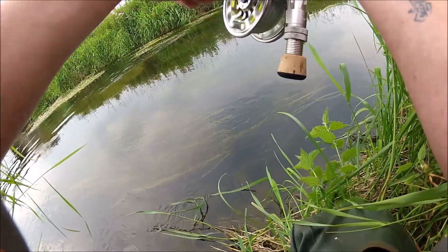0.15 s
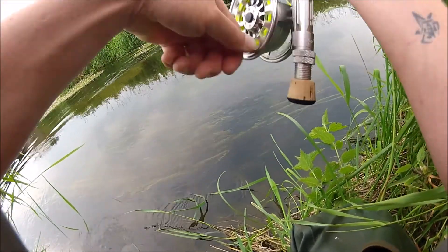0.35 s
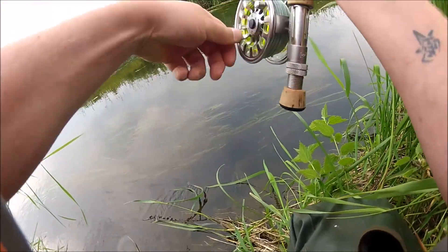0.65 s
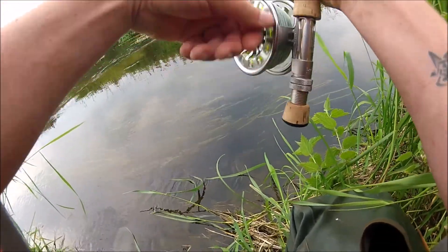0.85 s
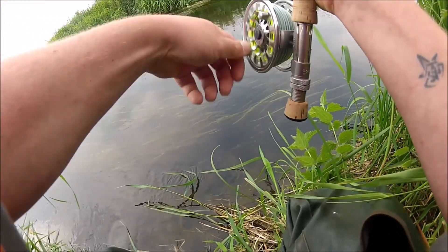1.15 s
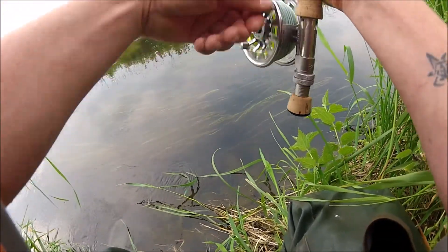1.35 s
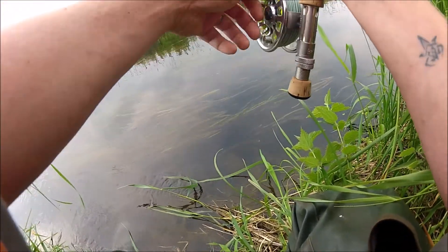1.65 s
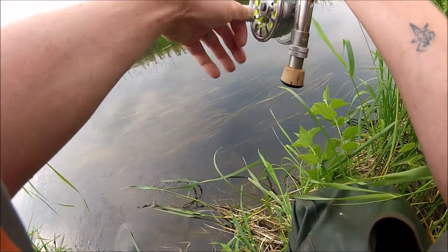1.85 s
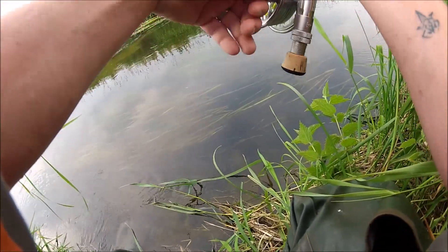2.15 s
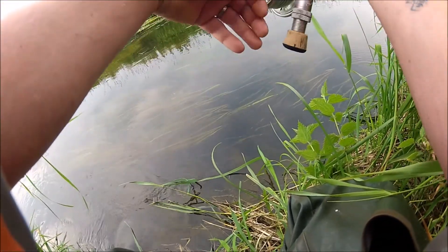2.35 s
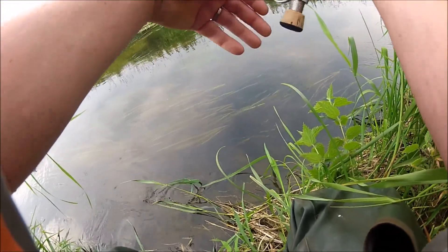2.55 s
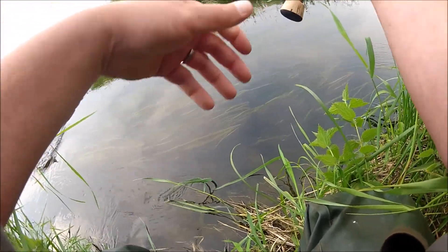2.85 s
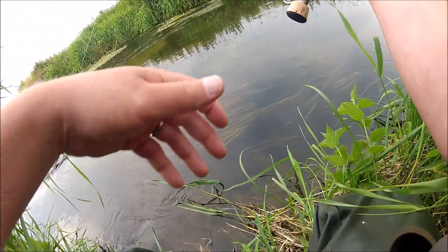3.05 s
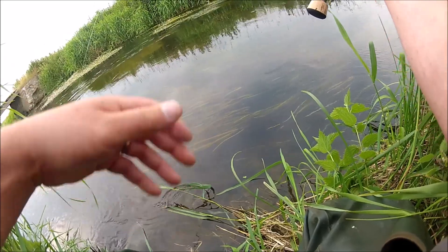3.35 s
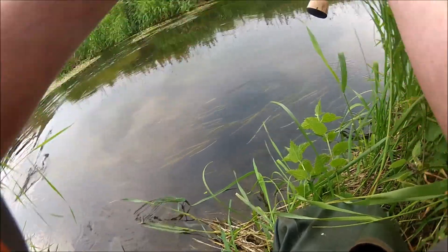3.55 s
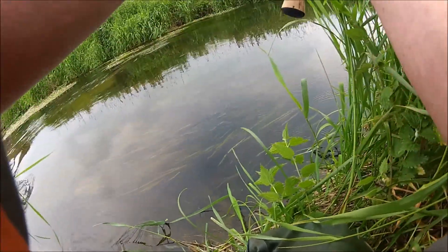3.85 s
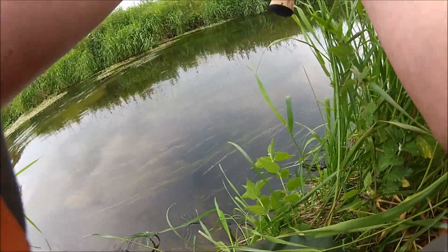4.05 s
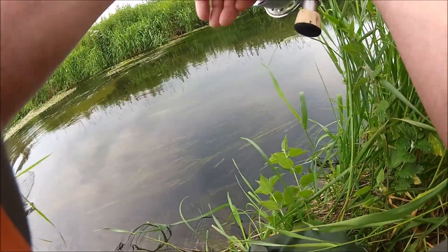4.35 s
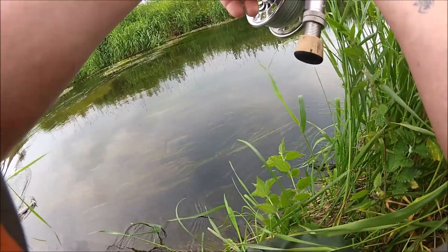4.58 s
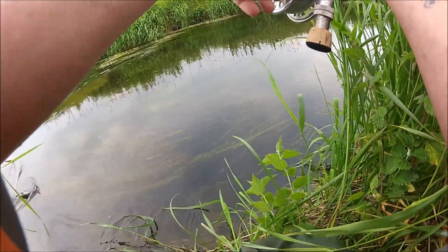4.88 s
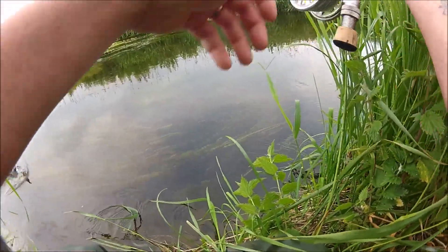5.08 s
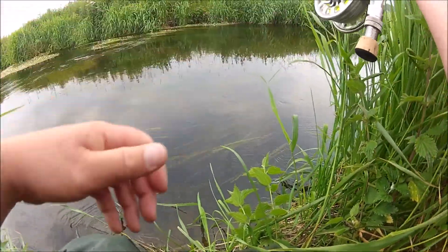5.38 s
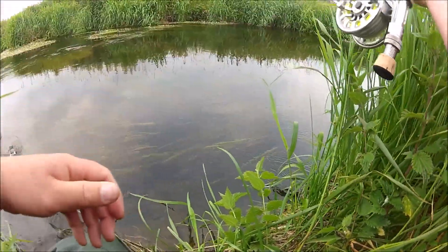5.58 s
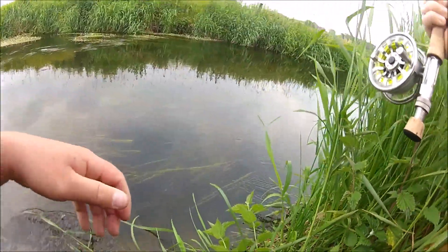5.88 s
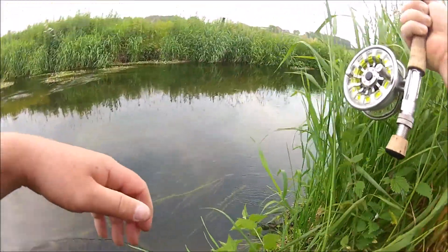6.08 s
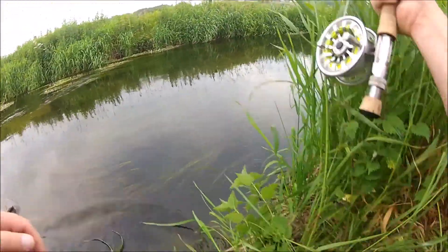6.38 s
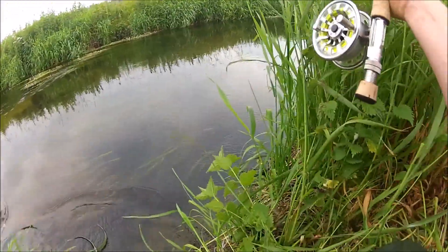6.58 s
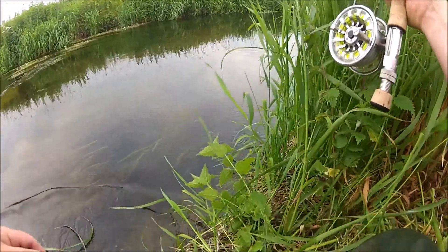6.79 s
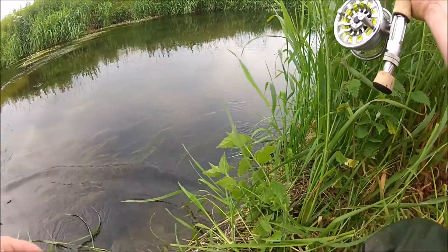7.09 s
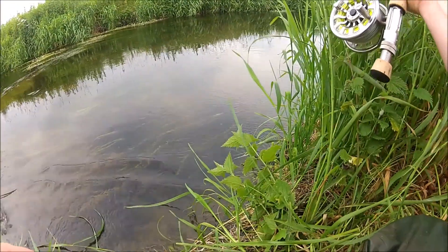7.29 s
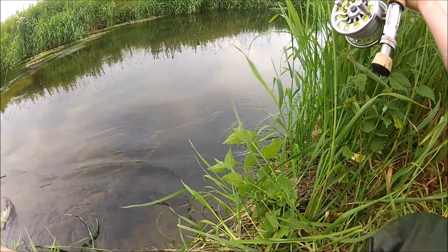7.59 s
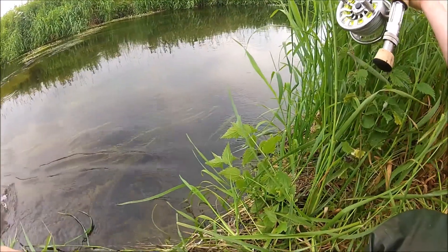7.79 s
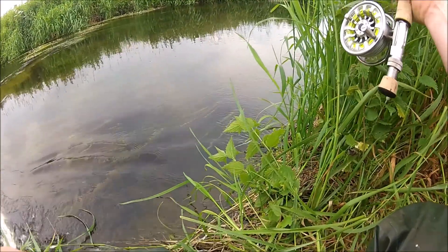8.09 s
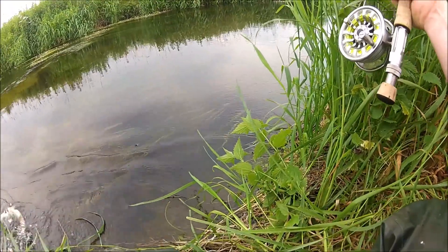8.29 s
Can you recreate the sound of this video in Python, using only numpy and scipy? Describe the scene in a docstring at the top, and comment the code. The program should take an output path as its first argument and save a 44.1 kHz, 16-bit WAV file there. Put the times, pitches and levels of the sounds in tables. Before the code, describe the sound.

A fly reel's click pawl snaps and ratchets in uneven metallic bursts, with hollow knocks, brief squeaks and soft hand rubbing, outdoors and very close.

```python
"""A fly reel clicks outdoors, close to the microphone of a camera in a sealed case.
Its sprung pawl snaps over gear teeth, singly and in quick runs: metallic chatter, then a hollow knock.
Fast runs merge into a sung tone or a squeak; soft taps, thin ticks, dull thumps and short tones lie between.
Behind it hands, sleeves and line rub and rustle as shaped noise, over a quiet wash of air."""
import sys
import numpy as np
from scipy import signal
from scipy.fft import rfft, irfft, next_fast_len
from scipy.io import wavfile
from scipy.ndimage import uniform_filter1d

SR = 44100
rng = np.random.default_rng(int(sys.argv[2]) if len(sys.argv) > 2 else 0)


def log_audio(samples):
    """Write samples as a 16-bit WAV file to the path given in sys.argv[1]."""
    # one column per channel
    frames = np.atleast_2d(samples).T
    # limit to full scale, then quantise
    limited = np.clip(frames, -1, 1)
    pcm = np.round(limited * 32767).astype(np.int16)
    wavfile.write(sys.argv[1], SR, pcm)


N = 371742


# how far the knock stands above the chatter as grip and angle of the reel change: t/s, level/dB
HOLLOWNESS = [(.2, 7.5), (1.5, 6.5), (2.75, 3.5), (3.3, 1.5), (3.46, 10.5), (3.7, 6), (4.5, 4), (5.1, 6.5),
              (5.45, 1), (6.02, 8.5), (6.44, 4), (6.9, 4), (8.43, 9.5)]


def hollowness(s):
    """The knock's level over the chatter in dB, gliding between the table's points."""
    return np.interp(s, *np.transpose(HOLLOWNESS))


# above this speed the pawl no longer drops in but skates, struck once per swing of the body: a squeak
SKATE_PER_S = 235


def skating(rate):
    """How far a run has turned to squeak, 0-1, rising with the speed in teeth per s."""
    return np.clip(5 * (rate / SKATE_PER_S - 1), 0, 1)


# single snaps of the pawl: t/s, relative chatter level/dB, knock pitch f/Hz
SNAPS = [(.032, -25, 484), (0.1814, -19.5, 995), (0.1907, -12.5, 620), (0.3183, -30, 700),
         (0.3334, -19.5, 609), (0.5723, -20.5, 790), (1.092, -25.5, 758), (1.1863, -29.5, 800),
         (1.3115, -29.5, 570), (1.4338, -18, 790), (1.5, -13, 1013), (1.632, -31, 600),
         (1.7603, -14.5, 1039), (2.7292, -16.5, 746), (2.765, -12, 676), (2.853, -14, 787),
         (3.3164, -14, 712), (3.4405, -13, 685), (3.4642, -13, 640), (3.617, -15, 945), (3.692, -21, 730),
         (3.8044, -23.5, 626), (3.8308, -29.5, 600), (3.889, -25.5, 685), (3.919, -25.5, 718),
         (4.0227, -22, 553), (4.0498, -28, 618), (4.1831, -17.5, 595), (4.4474, -23.5, 914),
         (4.466, -23.5, 655), (4.554, -22, 905), (5.203, -17.5, 701), (5.2789, -16, 699),
         (5.3892, -16.5, 944), (5.4281, -16, 999), (5.5196, -19, 968), (5.5468, -16.5, 996),
         (5.5792, -18.5, 902), (5.6047, -18, 873), (5.6316, -18.5, 451), (5.6508, -18.5, 633),
         (5.67, -17.5, 936), (5.698, -17.5, 630), (5.7354, -15.5, 710), (5.8028, -14, 650),
         (5.831, -17, 858), (5.9, -18.5, 720), (5.9199, -18, 715), (5.9359, -19, 699), (6.4416, -16.5, 657),
         (6.6117, -18.5, 952), (6.656, -16, 920), (6.727, -13.5, 750), (8.067, -15, 663),
         (8.1358, -17, 722), (8.1967, -15.5, 677), (8.2114, -18, 670), (8.223, -15.5, 665),
         (8.232, -17, 708), (8.252, -16, 670), (8.3406, -15.5, 685), (8.4051, -16.5, 683)]
# the spool spins, one curve a run: t/s, speed/teeth per s, relative chatter level/dB, mean knock pitch f/Hz
RUNS = [
    [(3.476, 191, -16, 668), (3.513, 190, -19.5, 630)],
    [(3.524, 118, -32, 674), (3.593, 87, -25.5, 706)],
    [(4.393, 133, -23.5, 910), (4.436, 250, -25.5, 1005)],
    [(4.506, 110, -23.5, 714), (4.54, 130, -24, 804)],
    [(4.563, 245, -26.5, 955), (4.59, 197, -23.5, 962)],
    [(4.886, 83, -21.5, 1017), (4.934, 114, -19, 957.5), (4.985, 236, -22, 619), (5.045, 280, -21.5, 792),
     (5.066, 111, -20, 655), (5.144, 180, -19, 718.5)],
    [(5.282, 240, -18.5, 699), (5.306, 260, -18.5, 730), (5.322, 276, -19, 1143), (5.353, 266, -18, 916)],
    [(5.441, 82, -18, 909), (5.499, 82, -18, 894)],
    [(6.007, 83, -14, 635), (6.035, 76, -21.5, 630)],
    [(6.508, 270, -19, 646), (6.535, 262, -21, 601), (6.558, 290, -21, 1063), (6.581, 240, -20, 841)],
    [(6.624, 198, -18.5, 916), (6.64, 256, -18, 796)],
    [(6.802, 188, -13, 673), (6.836, 154, -13, 648.5)],
    [(6.847, 254, -13.5, 669.6), (6.92, 256, -15.5, 697)],
    [(7.923, 199, -15.5, 654), (7.96, 165, -18, 670)],
    [(8.089, 106, -15.5, 697.5), (8.115, 90, -19, 677)],
]
# soft dull taps of the pawl under light load: t/s, relative level/dB
TAPS = [(0.113, -22.5), (0.236, -23), (0.288, -21.5), (0.611, -25.5), (0.692, -21.5), (0.712, -25),
        (0.736, -21), (0.76, -18), (0.779, -23.5), (0.798, -19.5), (0.962, -27), (0.985, -30), (1.002, -26),
        (1.016, -30.5), (1.031, -33), (1.812, -29), (2.106, -28), (2.31, -23), (2.356, -26), (3.079, -25)]
# thin ticks, metal with little knock: t/s, relative chatter level/dB
TICKS = [(.069, -17), (.199, -21), (2.483, -30), (3.5155, -5.5), (3.599, -20.5), (3.767, -17.5),
         (4.2688, -20), (4.3743, -20.5), (4.711, -18.5), (5.317, -13), (5.3602, -19), (5.4102, -21.5),
         (6.5987, -19.5)]
# dull knocks of hand and handle, with little metal: t/s, knock level/dB, pitch f/Hz
THUMPS = [(1.2445, -12, 582), (1.654, -19.5, 604), (1.85, -20, 625), (2.2242, -17.5, 480),
          (2.235, -18, 596), (2.387, -24, 530), (2.508, -19, 613), (4.38, -9.5, 492), (4.496, -18, 930),
          (5.865, -10.5, 565), (5.9986, -12.5, 570), (6.2196, -11.5, 572)]
TICK_KNOCK_DB, TICK_HZ = -5, 822  # knock relative to the chatter
TAP_KNOCK_DB, TAP_HZ = -1.5, 753  # knock relative to the tap
THUMP_CHATTER_DB = -22  # chatter relative to the knock
SKATE_QUIET_DB = -10  # change of each blow when fully skating


def run_teeth(run):
    """The blows of one run: the next tooth follows at the spool's speed, in whole swings of the body."""
    rows = []
    times, *columns = np.transpose(run)
    s = times[0]
    for uneven, hard, deep, detune in rng.standard_normal((70, 4)):
        if s >= times[-1] + .001:
            break
        rate, db, hz = (np.interp(s, times, column) for column in columns)
        db += SKATE_QUIET_DB * skating(rate)
        hz *= 1 + .025 * detune
        chatter_db = db + 1.8 * hard
        knock_db = db + hollowness(s) + 2.5 * deep
        rows.append((s, chatter_db, knock_db, hz))
        # the pawl slips in step with the swinging body, so a fast run sings; fast runs are less even
        gap_s = np.exp(.0003 * rate * uneven) / rate
        s += max(np.round(gap_s * hz), 1) / hz
    return rows


def teeth():
    """Every blow as (t/s, relative chatter level/dB, knock level/dB, knock pitch f/Hz)."""
    rows = [(s, db, db + TICK_KNOCK_DB, TICK_HZ) for s, db in TICKS]
    rows += [(s, -np.inf, db + TAP_KNOCK_DB, TAP_HZ) for s, db in TAPS]
    rows += [(s, db + THUMP_CHATTER_DB, db, hz) for s, db, hz in THUMPS]
    rows += [(s, db, db + hollowness(s), hz) for s, db, hz in SNAPS]
    for run in RUNS:
        rows += run_teeth(run)
    return np.array(rows)


def chatter(rows):
    """The pawl lands and is struck again at each swing of the knocking body, so the chatter shares its pitch."""
    blows, t = np.zeros(N), np.arange(1200) / SR
    for s, db, _, hz in rows:
        grit, luck = rng.standard_normal(1200), rng.standard_normal((7, 2))
        contact = 0.13 * grit * np.exp(-t / 0.0039)
        # six strikes, about one swing apart
        swings = SR / hz * np.exp(.04 * luck[1:6, 0])
        at = np.cumsum(np.r_[0, swings]).astype(int)
        contact[at] += np.exp(-(at / SR * hz / 2.3) ** 2 + .2 * luck[:6, 1])
        # a weak contact lasts longer and is duller
        soft = np.clip(-.022 * db + 0.26 * luck[6, 0], 0, .85)
        contact = signal.lfilter([np.sqrt(1 - soft ** 2)], [1, -soft], contact)
        add(blows, s, gain_of(db) * contact)
    return gain_of(13.5) * metal(blows)


# ringing of spool and frame: f/Hz, width/Hz, relative level/dB
METAL = [(2003, 670, -0.5), (3040, 240, -6), (3540, 270, -5.5), (3994, 254, -6), (4760, 850, -7.5),
         (7090, 460, -10), (8040, 360, -7.5), (8680, 540, -7), (10030, 670, -7.5), (11290, 240, -13),
         (12790, 270, -12.5), (14100, 300, -12.5), (14530, 300, -9.5)]


def metal(x):
    """Rings the modes of spool and frame, which are too small to radiate bass."""
    t = np.arange(2000) / SR
    ring = np.zeros(2000)
    for k, (hz, width, db) in enumerate(METAL):
        decay = np.sqrt(width) * np.exp(-np.pi * width * t)  # a wider mode dies sooner
        ring += (-1) ** k * gain_of(db) * decay * np.sin(2 * np.pi * hz * t)
    ring = signal.sosfilt(signal.butter(3, 1500, "high", fs=SR, output="sos"), ring)
    return signal.oaconvolve(x, ring / np.linalg.norm(ring))[:N]


def knock(rows):
    """A hollow body swings up over a few cycles after the blow, drops fast and hums on faintly."""
    out, t = np.zeros(N), np.arange(2200) / SR
    for s, _, db, hz in rows:
        swing = np.exp(-((hz * t - 2.4) / 1.032) ** 2) * (1 - np.exp(-hz * t / 0.53))
        hum = 0.5 * (1 - np.exp(-t / 0.0011)) * np.exp(-t / 0.0058)
        body = swing * np.cos(2 * np.pi * hz * t)
        body += hum * np.sin(2 * np.pi * 0.832 * hz * t)  # the hum lies below the knock's pitch
        add(out, s, gain_of(db) * body)
    return out


# the two damped tones of a soft tap: mean f/Hz, decay/s, relative level/dB
TAP_RING = [(2120, 0.00035, 9), (1380, 0.0005, 4.5)]


def taps():
    """One cushioned blow wakes only two low modes, each slightly off its mean pitch."""
    out, t = np.zeros(N), np.arange(400) / SR
    for s, db in TAPS:
        for hz, decay, ring_db in TAP_RING:
            swell = t / decay * np.exp(-t / decay)
            pitch = hz * (1 + 0.078 * rng.standard_normal())
            add(out, s, gain_of(db + ring_db) * swell * np.sin(2 * np.pi * pitch * t))
    return out


SING_PER_S, SING_DB = 185, -5  # around this speed the knocks merge into a tone, this far from one knock
SQUEAK_DB, SQUEAK_TILT = -9.5, 0.38  # level relative to chatter; power by which overtones weaken


def singing():
    """In a fast run the body never rests between teeth and sings at its knock pitch; skating adds overtones."""
    out, strikes, waver = np.zeros(N), np.zeros(N), lumps(90, 2.3)
    for run in RUNS:
        times, *columns = np.transpose(run)
        t = np.arange(times[0], times[-1], 1 / SR)
        rate, db, hz = (np.interp(t, times, column) for column in columns)
        wobble = evened(uniform_filter1d(rng.standard_normal(len(t)), size=150))
        turns = np.cumsum(hz * (1 + 0.024 * wobble)) / SR + rng.random()
        fade = signal.windows.tukey(len(t), .3)
        merged = np.clip(2 * rate / SING_PER_S - 1.5, 0, 1) * fade
        tone_gain = gain_of(SING_DB + db + hollowness(t))
        add(out, times[0], merged * tone_gain * np.sin(2 * np.pi * turns))
        pulses = sum(np.cos(2 * np.pi * k * turns) / k ** SQUEAK_TILT for k in range(2, 15))
        add(strikes, times[0], skating(rate) * fade * gain_of(SQUEAK_DB + db) * pulses)
    return out * waver + metal(strikes * lumps(150, 2.7))


# short tones, gliding or nearly steady:
# t/s, length/s, starting level/dB, start f/Hz, end f/Hz, level of two added higher partials/dB
NOTES = [(2.328, 0.027, -14.5, 510, 630, -48), (2.767, .03, -6, 715, 708, -23.5),
         (7.767, .035, -23, 566, 285, -50)]


def notes():
    """Short tones, gliding or nearly steady, that start fast and die away under two steadier higher partials."""
    out = np.zeros(N)
    for s, length, db, start_hz, end_hz, upper_db in NOTES:
        u = np.arange(0, 1, 1 / (length * SR))  # progress through the tone
        phase = 2 * np.pi * np.cumsum(start_hz + (end_hz - start_hz) * u) / SR
        upper = gain_of(upper_db) * (np.sin(3 * phase) + np.sin(5 * phase))
        tone = gain_of(-16 * u) * np.sin(phase) + upper
        add(out, s, gain_of(db) * signal.windows.tukey(len(u), .4) * tone)
    return out * lumps(200, 2.7)


# handling close by: t/s, low rub level/dB, fine rustle level/dB
HANDLING = [(0, -42.5, -41), (.6, -44, -49), (1.45, -42.5, -53.5), (1.62, -46, -62), (1.8, -39, -49),
            (2.05, -53.5, -58.5), (2.8, -38, -47.5), (3.3, -49, -56), (3.6, -35.5, -48.5),
            (4.0, -38, -49.5), (4.8, -46, -57), (5.7, -32.5, -46.5), (6.08, -37.5, -47.5),
            (6.4, -29.5, -38), (6.7, -42, -55.5), (7.648, -61, -65.5), (8.0, -38.5, -46.5),
            (8.43, -52.5, -70)]
# colour of the rub: f/Hz, relative level/dB
RUB = [(35, -17), (240, -8), (640, -9.5), (850, -16), (1250, -23), (3000, -78)]


def impulses(reach_db, limit):
    """Sparse random impulses, about 70 a second, with heights spread in dB."""
    heights = gain_of(reach_db * np.minimum(rng.exponential(1, N), limit))
    return heights * (rng.random(N) < 70 / SR)


def handling():
    """Lumpy low rubbing and bumps carried through the rod; a crackling rustle of line that rings the reel."""
    s, rub_db, rustle_db = np.transpose(HANDLING)
    t = np.arange(N) / SR
    bumps = signal.oaconvolve(impulses(5.5, 2.6), np.exp(-t[:900] / 0.0022))[:N]
    rub = coloured(rng.standard_normal(N) * (lumps(40, 3.5) + .9 * evened(bumps)), RUB)
    crackle = signal.oaconvolve(impulses(5, 4), np.exp(-t[:600] / 0.00042))[:N]
    crackle = crackle * rng.standard_normal(N)
    rustle = rng.standard_normal(N) * lumps(22, 3)
    rustle += 0.45 * evened(uniform_filter1d(crackle, size=3))
    rustle = evened(metal(signal.lfilter([1], [1, -.75], rustle)))
    return gain_of(np.interp(t, s, rub_db)) * rub + gain_of(np.interp(t, s, rustle_db)) * rustle


# colour of the outdoor air: f/Hz, relative level/dB
AIR = [(15, -36), (25, -1.5), (591, -5.5), (1330, -40), (6050, -47.5), (12500, -21), (16000, -58.5)]
AIR_DB = -48  # rms level


def air():
    """Quiet outdoor wash and light breeze on the case: noise that wanders in level."""
    return gain_of(AIR_DB) * coloured(rng.standard_normal(N) * lumps(12, 2.5), AIR)


def gain_of(db):
    """Decibels to a factor."""
    return 10 ** (np.asarray(db) / 20)


def evened(x):
    """Scales to rms 1."""
    return x / np.sqrt(np.mean(x ** 2) + 1e-20)


def add(mix, s, sound):
    """Mixes a sound in at second s."""
    part = mix[round(s * SR):][:len(sound)]
    part += sound[:len(part)]


def coloured(x, points):
    """Filters x by the (f/Hz, level/dB) points, then scales to rms 1."""
    f, db = np.transpose(points)
    size = next_fast_len(len(x))
    hz = np.fft.rfftfreq(size, 1 / SR)
    curve_db = np.interp(np.log(hz + 1), np.log(f + 1), db)
    return evened(irfft(rfft(x, size) * gain_of(curve_db), size)[:len(x)])


def lumps(per_s, spread_db):
    """A gain that wanders at random, with per_s new levels a second."""
    knots = rng.standard_normal(4000)
    return gain_of(spread_db * np.interp(np.arange(N) / SR * per_s, np.arange(4000), knots))


def scene():
    """Reel, short tones, hands and air, one channel."""
    rows = teeth()
    reel = chatter(rows) + knock(rows) + taps() + singing()
    return (reel + notes() + handling() + air())[None]


# dips of the sealed case: f/Hz, width/Hz, depth/0-1
HOLLOWS = [(6050, 900, .85), (12050, 600, .92), (10500, 500, .85), (13400, 500, .8)]
EDGE_HZ = 16000  # upper band limit


def record(dry):
    """The sealed case cancels narrow bands, the hardest snaps overload the input; then the band limit."""
    for hz, width, depth in HOLLOWS:
        b, a = signal.iirpeak(hz, hz / width, SR)
        dry = dry - depth * signal.lfilter(b, a, dry)
    dry = np.clip(dry, -.9, .9)
    lowpass = signal.firwin(255, EDGE_HZ, window=("kaiser", 12), fs=SR)
    return signal.oaconvolve(dry, lowpass[None], "same")


dry = scene()
out = record(dry)
log_audio(out)
```